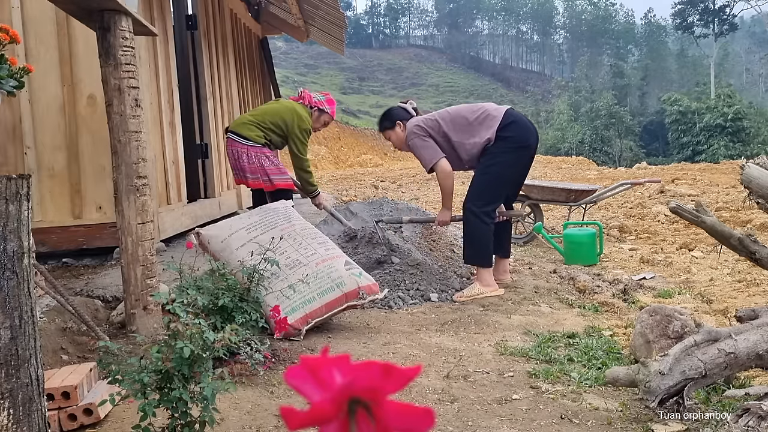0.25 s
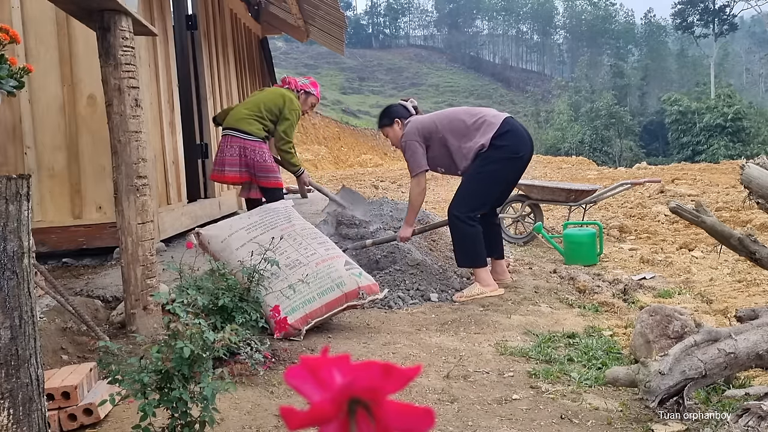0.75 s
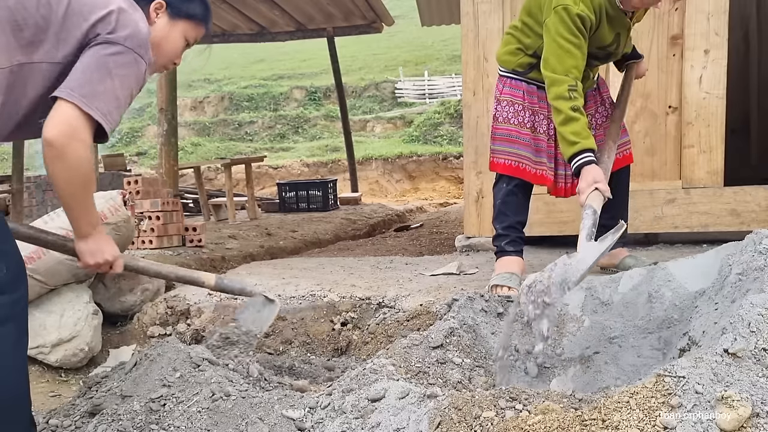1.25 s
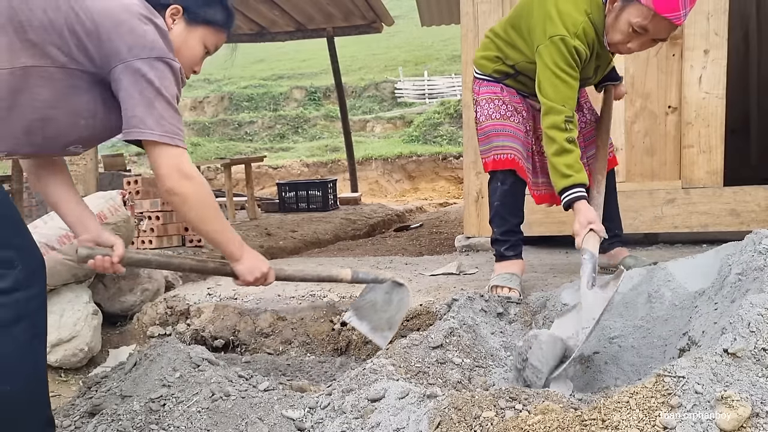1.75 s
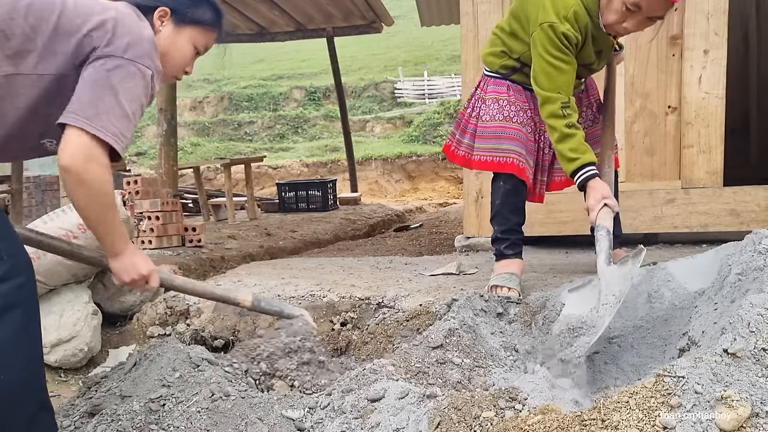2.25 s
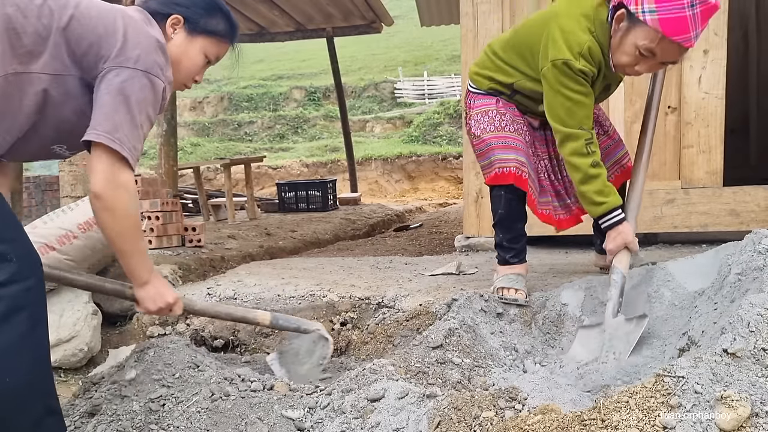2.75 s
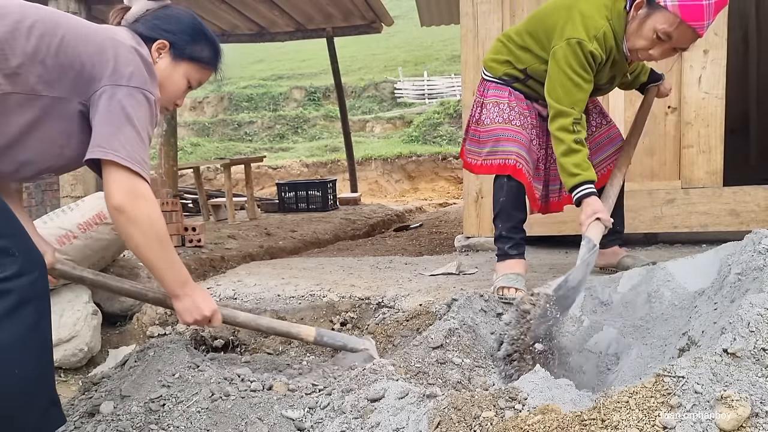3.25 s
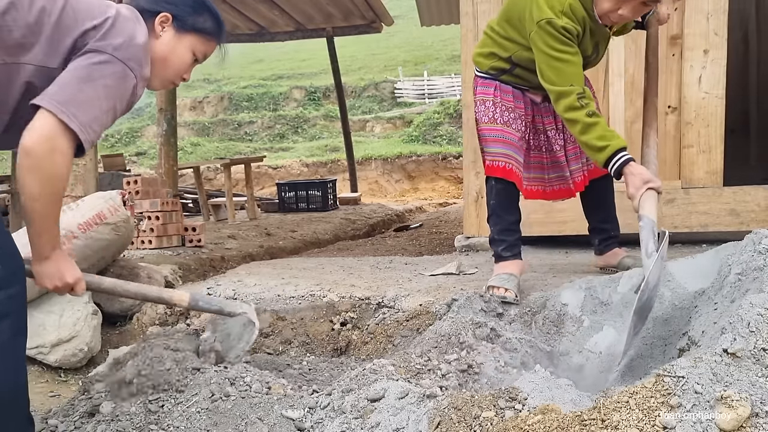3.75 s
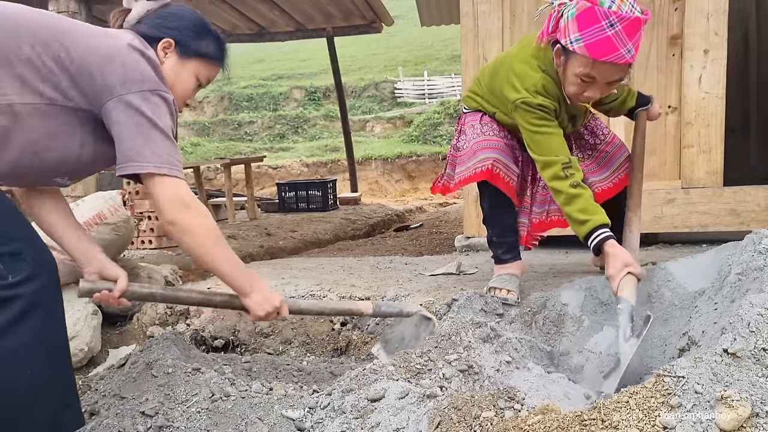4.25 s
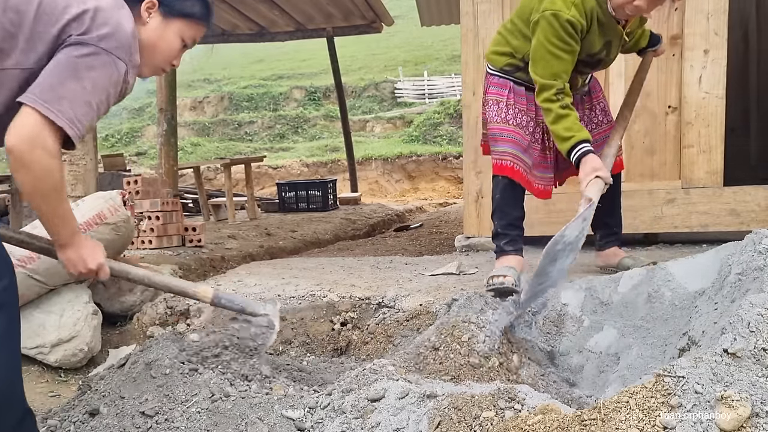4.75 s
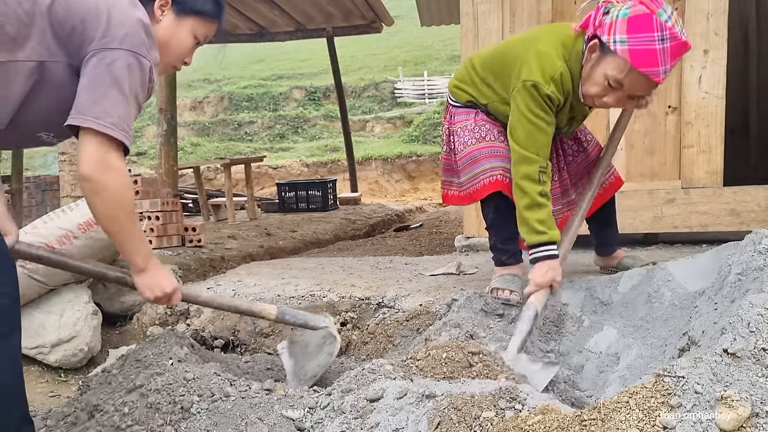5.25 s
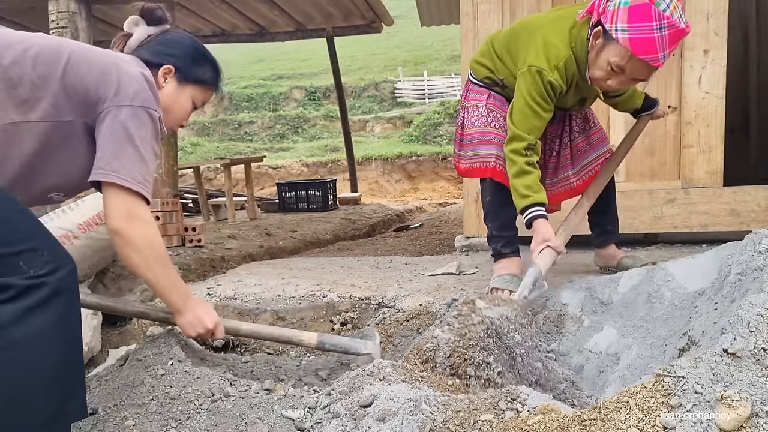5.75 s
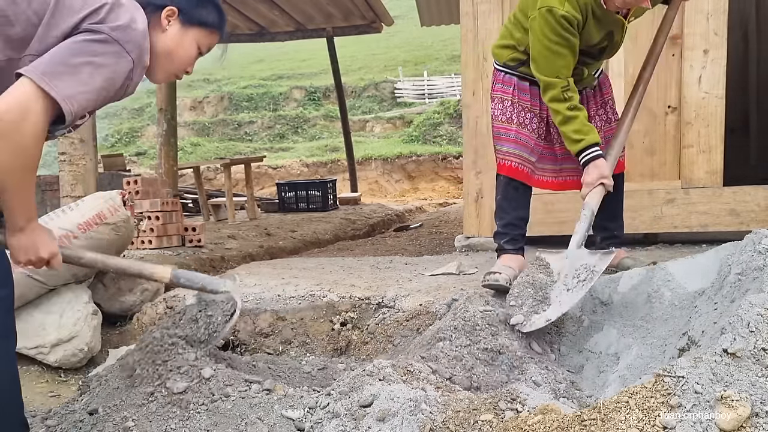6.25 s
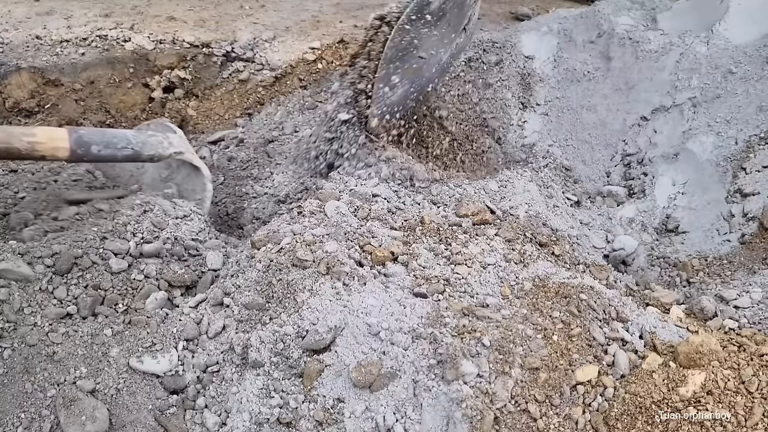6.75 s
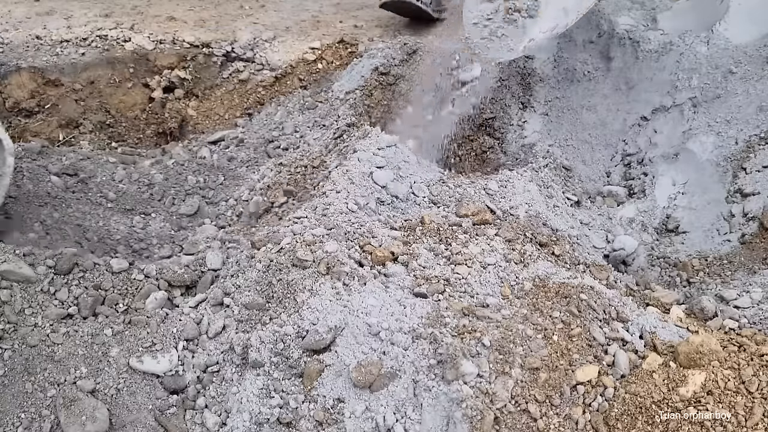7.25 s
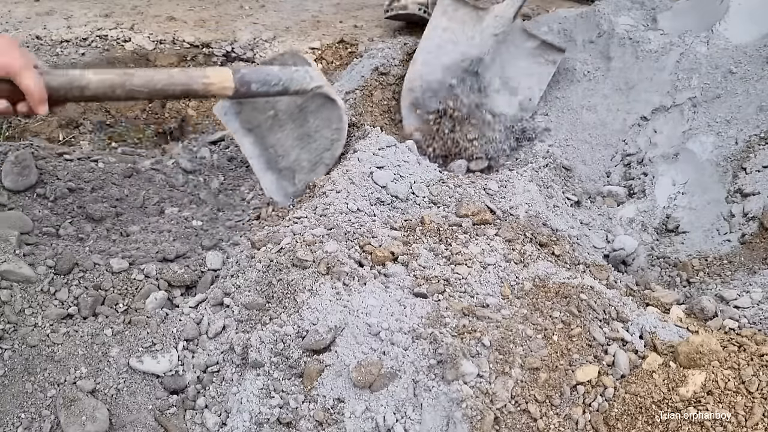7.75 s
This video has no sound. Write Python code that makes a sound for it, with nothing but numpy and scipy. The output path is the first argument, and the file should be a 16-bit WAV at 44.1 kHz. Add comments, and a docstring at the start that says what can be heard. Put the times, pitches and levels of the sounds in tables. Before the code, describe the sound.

Gritty shovel thrusts and short hoe drags turn a dry gravelly heap, with sharp stone knocks, slight clinks and a faint distant engine.

```python
"""Loose mix trickles first, over faint outdoor air; a hoe and a steel shovel then turn a dry heap.
The heap is cement and gravel beside a wooden house. Each stroke is a swarm of random grain contacts
that excites the blade's modes, split into thud, crunch and hiss. Stones crack and clack on the steel,
spills and pebbles settle, and free blades clink. A bird peeps twice as falling, fluttering tones;
a far engine drones for a while as a firing tone with its octave."""
import sys
import numpy as np
from scipy import signal
from scipy.fft import rfft, irfft
from scipy.io import wavfile

SR = 44100
rng = np.random.default_rng(int(sys.argv[2]) if len(sys.argv) > 2 else 0)


def digitize_waveform(pressure):
    """Quantize a signal to 16-bit integers and store it at the path in sys.argv[1].

    Rows of a 2-D input are taken as channels; values are limited to [-1, 1].
    """
    field = np.atleast_2d(pressure).T
    bounded = np.clip(field, -1, 1)
    quanta = np.round(bounded * 32767).astype(np.int16)
    wavfile.write(sys.argv[1], SR, quanta)


N = 352778  # length [samples]

# Outdoor air, spectral shape: (frequency [Hz], relative density [dB per Hz])
AIR_SPECTRUM = [(25, 0), (60, 16.5), (140, 10.5), (250, 5.5), (400, -9.5), (800, -3.5), (1600, -0.5),
                (3200, -1.5), (6000, -6.5), (15000, -17.5)]
# Far engine: (time [s], mean firing rate [Hz], level before gain and waver [dB])
ENGINE_COURSE = [(1.0, 42.5, -61), (1.24, 42.9, -65), (1.68, 44.6, -56), (1.82, 45.9, -66),
                 (2.27, 46.6, -57.5), (2.43, 51.75, -64), (3.29, 53, -59.5), (3.45, 44.8, -68),
                 (3.6, 43.4, -60)]
# Bird: (time [s], length [s], first pitch [Hz], last pitch [Hz], level [dB]); pitches before flutter
BIRD_PEEPS = [(1.234, 0.072, 4910, 2830, -56), (6.075, 0.1, 4610, 2700, -60.5)]
# Pebbles landing: (time [s], level of the whole tick [dB], thud re crunch [dB], hiss re crunch [dB])
PEBBLE_LANDINGS = [(0.516, -38, 0, 13), (.721, -39, 2, -16), (0.7688, -40.5, 2.5, 1.5),
                   (1.553, -33, 10, 22), (3.033, -41, 1, 3), (3.643, -54, 1, 9), (3.523, -46.5, -3, -15),
                   (5.8718, -32.5, 13, 1), (7.125, -41.5, -21.5, 14.5), (7.4474, -26.5, -10, 12)]
# Loose mix slides off a blade or down the heap:
# (time [s], build-up [s], peak level before gain [dB], fade [dB/s], thud re crunch [dB], hiss re crunch [dB])
SLIDES = [(0, 0.0017, -49, 91, 1, -0.5), (.525, 0.01, -51, 55, 0, 0), (.752, 0.0066, -52.5, 244, -8, -6.5),
          (.938, .006, -59, 33, -12, -2.5), (1.221, 0.0035, -47.5, 255, -10, -7),
          (1.272, 0.011, -55, 214, -9, -4), (2.19, 0.028, -59.5, 62, -2, -7),
          (2.451, 0.012, -57, 196, -9, -9.5), (2.93, 0.07, -57, 75, 2, -1.5),
          (3.21, 0.043, -47.5, 143, -4, -1.5), (3.471, 0.019, -57.5, 43, -16, 0.5),
          (3.705, 0.047, -47.5, 113, -3, -2), (4.59, 0.025, -45.5, 133, -11, -6),
          (4.69, 0.034, -61, 97, 1, -11), (4.912, 0.028, -55, 174, -12, -8),
          (5.522, 0.022, -57.5, 60, -17, -3), (5.805, 0.021, -42.5, 116, -5.5, -3.5),
          (5.95, 0.021, -59.5, 21, -7.5, 2), (6.273, 0.019, -54, 52, -15, -3.5),
          (6.753, .006, -53.5, 53, -2, -6), (6.855, 0.04, -52, 13, -6, -4), (7.07, 0.011, -63, -3, -5, 4.5),
          (7.5, 0.023, -48.5, 106, -5.5, -0.5), (7.56, 0.024, -49.5, 69, -7, -1)]
# A free blade clinks: (time [s], level of the whole clink [dB], skid time constant [s], grit re ring [dB])
FREE_CLINKS = [(3.448, -29, 0.0044, 3), (7.030, -21.5, 0.0025, -14), (7.037, -27.5, 0.0068, 13)]
# Blades on stones: (time [s], level of the whole blow before gain [dB], thud re crunch [dB],
# hiss re crunch [dB], clack pitch [Hz], crushing time constant [s], clack re crunch [dB])
SHOVEL_HITS = [(1.2261, -29, 10, -3.5, 4200, 0.0058, 6.5), (1.2766, -33.5, 8, -15, 2930, 0.014, 0),
               (1.317, -35.5, -1, -7, 1560, 0.005, -25), (2.5677, -34.5, -6, -1, 1460, 0.0097, 5),
               (2.6865, -19, -7, 11, 1100, 0.0056, 19), (2.6995, -19.5, 6, 12, 1510, 0.008, 22),
               (2.9514, -32.5, 7, 0, 760, 0.0054, -13), (3.8701, -23.5, -13, 15, 2570, 0.0028, -7),
               (4.0555, -24, -7, 0, 1195, 0.023, 2), (4.1042, -25, -5, 4, 1180, 0.01, 8),
               (5.0479, -23, -34, 3, 4270, 0.0043, -7), (5.1635, -21, -9, 12, 3240, 0.013, -2),
               (5.2357, -17.5, -12, -28, 1084, 0.015, -3), (5.9896, -29.5, -22, -12, 2430, 0.0084, -12),
               (6.0144, -26, -17, -5, 3580, 0.0023, -19), (6.3283, -27.5, -4, 1, 4800, 0.01, 4),
               (6.365, -18, -24, 0, 2240, 0.0027, 0), (6.383, -24, -14, -2, 2000, 0.0027, 6),
               (6.5172, -16.5, 21, 18, 1460, 0.0042, 22), (6.5849, -21.5, 11, 16, 1410, 0.0042, -7),
               (7.8195, -7.5, -31, -12, 1450, 0.012, 3), (7.8319, -11.5, -28, -18, 1490, .012, 4),
               (7.8947, -15.5, -1, -13, 1090, 0.0049, -3)]
HOE_HITS = [(.3922, -36.5, -25, -12, 3370, .008, 0), (1.0215, -33.5, -5, -15, 3260, 0.009, 3),
            (1.4412, -33, -22, 19, 3060, 0.0038, 10), (1.4941, -27.5, 4, -15, 710, .0065, 10),
            (1.5925, -30, -20, 1, 607, 0.014, 9), (1.6407, -28, -15, 15, 3540, 0.0058, -12),
            (1.9615, -34, -22, 6, 2920, 0.0059, -1), (1.977, -29, -15, 8, 3780, 0.004, -8),
            (2.0005, -10.5, -32, 1.5, 3240, 0.0021, -9), (2.0147, -16.5, -14, -7, 1710, 0.0054, 6),
            (2.0212, -11, -21, -2, 1250, 0.0016, 5.5), (3.1441, -27.5, -1, 3, 2250, 0.0059, 6),
            (3.156, -19, -14, -3, 2230, 0.0089, -23), (4.2684, -30, -3, -6, 1620, 0.0052, 10),
            (4.3675, -17.5, -16, 7, 2010, 0.0017, 12.5), (5.5845, -27, -32, 3, 2760, 0.0086, -1),
            (5.6402, -28.5, -25, -7, 1660, 0.013, 10), (5.673, -17, 2, -3, 3340, 0.0053, -5),
            (5.6912, -12.5, 4, 6, 185, 0.0047, 4), (5.6974, -8, 0, -0.5, 700, 0.0038, -4.5),
            (7.2691, -18.5, -2, -2, 704, 0.0021, 16), (7.3477, -22.5, -18, -0.5, 750, 0.0046, 4.5),
            (7.6519, -22, -6, -3, 4400, 0.003, -16), (7.6885, -12, -5, -1.5, 3620, 0.0091, -19),
            (7.6935, -15, -9, -22, 3200, 0.011, -3), (7.773, -11, -8, -1, 2920, 0.0057, 4)]
# Strokes, the shovel pushed in and the hoe dragged: (time [s], stroke length [s],
# mid-stroke crunch level before gain and arch [dB], swell over the stroke [dB], fade [dB/s],
# thud re crunch [dB], hiss re crunch [dB])
SHOVEL_STROKES = [(2.582, 0.28, -41.5, 1, 158, -3.5, -0.5), (3.868, 0.27, -42.5, -1.5, 186, -3.5, -2.5),
                  (5.047, 0.26, -35, 2, 209, -10, -2.5), (6.32, 0.31, -38.5, 6.5, 270, -5.5, -1),
                  (7.686, 0.21, -30, 4, 183, -10.5, -7.5)]
HOE_STROKES = [(.39, 0.037, -47.5, 8.5, 224, -3, 1.5), (1.018, 0.068, -44.5, 5, 248, -4.5, -3.5),
               (1.44, 0.083, -42.5, -1, 229, -6.5, -1), (1.594, 0.068, -47.5, 7.5, 188, -5, -5),
               (1.96, 0.079, -41.5, 6.5, 302, -3, -1), (2.06, 0.052, -42.5, 2, 260, -5, -9.5),
               (3.132, 0.031, -38, 0, 168, -0.5, -1), (4.28, 0.22, -44, 2.5, 136, -3.5, -3.5),
               (5.586, 0.18, -44, -4.5, 129, -3, -0.5), (5.668, 0.038, -39.5, -3.5, 600, 10, 6),
               (7.236, 0.037, -38.5, 8, 300, -3.5, -0.5), (7.322, 0.14, -49, -9.5, 300, 2, -1),
               (7.648, 0.038, -35.5, -8, 200, -17, -5)]
# Mean blade modes before each contact's shift: (frequency [Hz], level [dB], unburied t60 [s])
SHOVEL_RESONANCES = [(1190, -44, 0.064), (1162, 6.5, 0.25), (1340, -43, 0.029), (1430, -2, 0.12),
                     (1570, 14.5, 0.065), (1880, 5, 0.053), (2170, -23, .06), (2250, 13.5, 0.15),
                     (2716, 12, 0.083), (2830, -6, 0.45), (3240, 9, 0.078), (4580, -14, 0.2)]
HOE_RESONANCES = [(613, -19, .1), (740, 0, 0.14), (1149, 4.5, 0.14), (1454, 5, 0.08), (1745, -1.5, 0.29),
                  (2400, 0, 0.072), (2250, 1, 0.043), (3000, 17.5, 0.032), (3460, 15, 0.054),
                  (4200, -35, .09), (5450, 0, 0.13)]
CLINK_RESONANCES = [(604, 9, 0.11), (1390, 18.5, 0.078), (1380, -4, 0.066), (1920, 15, 0.071),
                    (2010, -8, 0.028), (2090, 11, .04), (2210, -10, 0.043), (2530, 2.5, 0.093),
                    (3330, -18, 0.1), (3460, -2, 0.1), (3900, -18, 0.15), (4660, -8, 0.081)]
# Spectra of grain contacts, cracking stone and snapping grit: (frequency [Hz], relative density [dB per Hz])
SHOVEL_SPECTRUM = [(30, -7), (70, 3), (160, 9), (250, 7), (380, -0.5), (620, 8), (900, -13.5), (1120, 5.5),
                   (1280, 6.5), (1470, 5.5), (1750, 7), (3000, 6), (5000, 1.5), (8000, 5), (15000, -5)]
HOE_SPECTRUM = [(30, -6), (70, -1), (170, 8), (350, 2), (650, 7.5), (1000, -12), (2000, 0), (3300, -9),
                (5000, -10.5), (8000, -9.5), (15000, -25)]
SPILL_SPECTRUM = [(30, -14), (80, 5), (160, 9.5), (350, 5.5), (650, 10), (1000, -6), (1800, 1), (3300, -6),
                  (5000, -11), (8000, -12.5), (15000, -23)]
CRACK_SPECTRUM = [(30, -51), (80, -18), (180, -5), (380, -1.5), (800, 2.5), (1400, 11.5), (2400, 15),
                  (3500, 4), (5000, 0.5), (8000, -4.5), (15000, -17.5)]
SNAP_SPECTRUM = [(100, -19), (700, -5), (2500, 1.5), (8000, -5), (15000, -20)]
# Microphone responses: (frequency [Hz], gain [dB])
LEFT_RESPONSE = [(60, 3), (500, -3.5), (1100, -1.5), (3500, 0), (6800, -1), (7900, 4), (8900, -5),
                 (15000, 3)]
RIGHT_RESPONSE = [(60, -1.5), (500, -4), (1100, -2), (3500, 1.43), (6800, 3.5), (7900, 6.5), (8900, -0.5),
                  (15000, 5)]

LOW_HZ, HIGH_HZ = 900, 5000  # borders between thud, crunch and hiss
TOP_HZ = 15700  # upper limit of the microphones
AIR_SWAY_DB = 1.5
ENGINE_FROM_S, ENGINE_UNTIL_S, ENGINE_FADE_S = 0.87, 3.67, 0.25
YARD_T60_S = 0.2
SNAP_DB, SNAP_SPREAD_DB = -13.5, 2  # snaps against the rub, spread of their sizes
SURGE_DB = 3.5  # clustering of stones
TAIL_DB = 40  # a stroke is followed down by this much
SLIDE_REST_S = 0.3  # a slide has nearly come to rest after about this long


def undb(db):
    """Amplitude is ten to the power of decibels over twenty."""
    return 10 ** (np.asarray(db) / 20)


def unit(x):
    """Normalisation to a root mean square of 1."""
    return x / np.sqrt(np.mean(x ** 2) + 1e-20)


def add(out, s, x):
    """Superposition: a sound joins the mix at time s [s]."""
    i = int(np.clip(s * SR, 0, N - 1))
    out[:, i:i + x.shape[1]] += x[:, :N - i]


def through(x, response):
    """Linear filtering: convolution with an impulse response."""
    return signal.fftconvolve(x, np.atleast_2d(response), axes=1)[:, :x.shape[1]]


def colour(points, size=2048):
    """Minimum phase: folding the cepstrum makes a (Hz, dB) spectrum a causal impulse response."""
    hz, db = np.transpose(points)
    freqs = np.maximum(np.arange(size // 2 + 1) * SR / size, 1)
    gain = undb(np.interp(np.log(freqs), np.log(hz), db))
    cepstrum = irfft(np.log(gain))
    cepstrum[1:size // 2] *= 2
    cepstrum[size // 2 + 1:] = 0
    return irfft(np.exp(rfft(cepstrum)))


def walk(n, rate):
    """Random modulation: straight lines join normal random values drawn at the given rate [1/s]."""
    return np.interp(np.arange(n) / SR * rate, np.arange(4096), rng.standard_normal(4096))


def air(level_db=-60.0):
    """Partial coherence: the rumble is alike on both sides, the hiss differs between them."""
    common, difference = rng.standard_normal((2, N))
    difference = signal.sosfilt(signal.butter(1, 900, "high", fs=SR, output="sos"), difference)
    noise = common + np.array([[1], [-1]]) * difference
    sway_db = AIR_SWAY_DB * walk(N, 2.53)
    return unit(through(noise, colour(AIR_SPECTRUM))) * undb(level_db + sway_db)


def engine(gain_db=1.0, second_db=-14, waver_db=5.0):
    """Periodic firing: only the fundamental and its octave carry from a far engine."""
    t = np.arange(N) / SR
    s, hz, db = np.transpose(ENGINE_COURSE)
    firing_hz = np.interp(t, s, hz) * (1 + 0.013 * walk(N, 10.7))
    phase = 2 * np.pi * np.cumsum(firing_hz) / SR
    tone = unit(np.sin(phase) + undb(second_db) * np.sin(2 * phase))
    fade = np.clip(np.minimum(t - ENGINE_FROM_S, ENGINE_UNTIL_S - t) / ENGINE_FADE_S, 0, 1)
    level_db = np.interp(t, s, db) + gain_db + waver_db * walk(N, 10)
    return tone * fade * undb(level_db)


def yard(x, wet_db=-16, dull_hz=4500):
    """Diffuse reflection: the house wall and eaves return a short, dull, decaying scatter."""
    t = np.arange(SR // 2) / SR
    decay = np.exp(-np.log(1000) * t / YARD_T60_S) * np.clip(t / 0.0009, 0, 1)
    tail = rng.standard_normal((2, len(t))) * decay
    tail = signal.sosfilt(signal.butter(2, [500, dull_hz], "band", fs=SR, output="sos"), tail)
    return x + undb(wet_db) * through(x, unit(tail) / np.sqrt(len(t)))


def bird():
    """Frequency modulation: husky whistles glide down and flutter in pitch and level."""
    out = np.zeros((2, N))
    for s, length, first_hz, last_hz, db in BIRD_PEEPS:
        u = np.linspace(0, 1, int(length * SR))
        pitch_hz = last_hz + (first_hz - last_hz) * (1 - u) ** 1.7 + 200 * walk(len(u), 417)
        phase = 2 * np.pi * np.cumsum(pitch_hz) / SR
        envelope = (u * (1 - u)) ** .3 * undb(4 * walk(len(u), 130))
        tone = unit(np.sin(phase) * envelope)
        add(out, s, undb(db) * tone[None])
    return out


def blade(modes, detune=0.0074):
    """Modal synthesis: decaying steel modes, energy 1; load and contact point shift them each time."""
    hz, db, t60 = np.transpose(modes)[:, :, None]
    shift, size = rng.standard_normal((2, len(modes), 1))
    t = np.arange(SR // 5) / SR
    decay = undb(db + 2 * size - 60 * t / t60)
    ring = np.sum(decay * np.sin(2 * np.pi * hz * (1 + detune * shift) * t), axis=0)
    return unit(ring) / np.sqrt(len(t))


def clack(hz, cycles):
    """Strong damping: one stone's pitch dies away within a few cycles."""
    t = np.arange(SR // 25) / SR
    return unit(np.sin(2 * np.pi * hz * t) * np.exp(-t * hz / cycles))


def grains(n, spread_db, lag, scatter=3.5, count=7000):
    """Shot noise: random contacts in up to a second; the left channel has its own lag [samples]."""
    at = rng.integers(0, SR, count)
    size_db = spread_db * np.minimum(rng.exponential(size=count), 5)
    size = undb(size_db) * rng.choice([-1, 1], count)
    late = np.round(lag + scatter * rng.laplace(size=count)).astype(int)
    return np.array([np.bincount(i % SR, size, SR)[:n] for i in (at + late, at)])


def stones(n, lag, centre_hz=1500, octaves=1.71, tick_db=5, spread_db=5, count=320):
    """Random impacts: up to a second of coarse stones, each with a tick and a pitch of its own."""
    out = np.zeros((2, N))
    for at, pitch, size in rng.random((count, 3)):
        sound = clack(centre_hz * 2 ** (octaves * (2 * pitch - 1)), cycles=3)
        sound[0] += undb(tick_db) * sound.max()
        sound = np.pad(sound, 32) * undb(-spread_db * np.log(max(size, .06)))
        add(out, at, np.array([np.roll(sound, round(lag)), sound]))
    return out[:, :n]


def parts(x):
    """Band splitting: a contact sound divides into thud, crunch and hiss."""
    cuts = [(LOW_HZ, "low"), ([LOW_HZ, HIGH_HZ], "band"), (HIGH_HZ, "high")]
    return [signal.sosfilt(signal.butter(4, hz, kind, fs=SR, output="sos"), x) for hz, kind in cuts]


def burst(crush_s, lag, press=0.43):
    """Brittle fracture: a run of contacts builds under pressure and fades quickly."""
    t = np.arange(SR // 5) / SR
    build = np.minimum(t / (press * crush_s + 1e-5), 1)
    return grains(len(t), 2.7, lag, scatter=2.7, count=16000) * np.exp(-t / crush_s) * build


def knock(push, contact, thud_db, hiss_db):
    """Impact spectrum: the dry contact, with its shares of thud and hiss."""
    thud, crunch, hiss = map(unit, parts(through(push, contact)))
    return crunch + undb(thud_db) * thud + undb(hiss_db) * hiss


def sized(x, db, crush_s):
    """Impact energy: that of level db held for the crushing time, at least 2 ms."""
    return unit(x) * undb(db) * np.sqrt(max(crush_s, .002) * SR / x.shape[1])


def pebbles(crush_s=0.00063):
    """Short impact: loose pebbles land with a tick and no blade ring."""
    out, contact = np.zeros((2, N)), colour(CRACK_SPECTRUM)
    for s, db, thud_db, hiss_db in PEBBLE_LANDINGS:
        tick = knock(burst(crush_s, lag=0), contact, thud_db, hiss_db)
        add(out, s, sized(tick, db, crush_s))
    return out


def lifetime(rise_s, fade_db_per_s):
    """Decay time: the time axis of a stroke's rise and fade, kept between 0.05 and 1 s."""
    length_s = np.clip(rise_s + TAIL_DB / max(fade_db_per_s, 1), .05, 1)
    return np.arange(int(length_s * SR)) / SR


def grind(n, grit, modes, ring_db, spread_db, judder_db, lag, stones_db):
    """Stick-slip friction: gravel on steel comes in uneven surges; gives thud, crunch and hiss."""
    swarm = grains(n, spread_db, lag) * undb(judder_db * walk(n, 130.1))
    rub = unit(through(swarm, colour(grit)))
    buried = np.multiply(modes, [1, 1, .5])  # it rings half as long
    rub += undb(ring_db) * unit(through(swarm, blade(buried)))
    snaps = grains(n, SNAP_SPREAD_DB, lag, count=330)  # coarse grit under the edge
    rub += undb(SNAP_DB) * unit(through(snaps, colour(SNAP_SPECTRUM)))
    clusters = stones(n, lag) * undb(SURGE_DB * walk(n, 35.7))
    rub += undb(stones_db) * unit(clusters)
    return map(unit, parts(rub))


def spills(gain_db):
    """Granular flow: a slide of loose mix gathers, then trickles out."""
    out = np.zeros((2, N))
    for s, build_s, db, fade, thud_db, hiss_db in SLIDES:
        t = lifetime(build_s, fade)
        flow = np.minimum(t / build_s, 1) * undb(db + gain_db - fade * np.maximum(t - build_s, 0))
        flow *= np.exp(-(t / SLIDE_REST_S) ** 4)
        thud, crunch, hiss = grind(len(t), SPILL_SPECTRUM, SHOVEL_RESONANCES, ring_db=-8, spread_db=.8,
                                   judder_db=2.5, lag=1, stones_db=-9)
        add(out, s, flow * (undb(thud_db) * thud + crunch + undb(hiss_db) * hiss))
    return out


def clinks(thud_db=-22, hiss_db=-8):
    """Free vibration: lifted clear of the heap, a blade rings more freely and hardly thuds."""
    out, contact = np.zeros((2, N)), colour(CRACK_SPECTRUM)
    for s, db, skid_s, grit_db in FREE_CLINKS:
        push = burst(skid_s, lag=5.7)
        radiated = np.diff(blade(CLINK_RESONANCES, detune=0.0066))  # an open plate radiates little bass
        sound = unit(through(push, radiated))
        sound += undb(grit_db) * knock(push, contact, thud_db, hiss_db)
        add(out, s, sized(sound, db, skid_s))
    return out


def knocks(table, modes, ring_db, lag, gain_db):
    """Impact excitation: one crack drives both the stone's clack and the steel's ring."""
    out, contact = np.zeros((2, N)), colour(CRACK_SPECTRUM)
    for s, db, thud_db, hiss_db, hz, crush_s, clack_db in table:
        push = burst(crush_s, lag)
        sound = knock(push, contact, thud_db, hiss_db)
        sound += undb(clack_db) * unit(through(push, clack(hz, cycles=4)))
        sound += undb(ring_db) * unit(through(push, blade(modes)))
        add(out, s, sized(sound, db + gain_db, crush_s))
    return out


def digs(table, grit, modes, bite_s, load_s, lift_s, arch_db, linger,
         ring_db, spread_db, judder_db, lag, stones_db, gain_db):
    """Driven friction: the edge bites, effort arches, the mix settles; thud grows with load and lingers."""
    out = np.zeros((2, N))
    for s, length, db, swell_db, fade, thud_db, hiss_db in table:
        t = lifetime(length, fade)
        progress = np.minimum(t / length, 1)
        after_s = np.maximum(t - length, 0)
        effort_db = db + gain_db + swell_db * (progress - .5) + arch_db * np.sin(np.pi * progress)
        settle_db = -fade * after_s
        # linger is the share of the settling, in dB, that the thud is spared
        load = (1 - np.exp(-(t / load_s) ** 2)) * undb(thud_db - linger * settle_db)
        thud, crunch, hiss = grind(len(t), grit, modes, ring_db, spread_db, judder_db, lag, stones_db)
        contact = np.minimum(t / bite_s, 1) * np.exp(-(after_s / lift_s) ** 4)  # until the blade lifts clear
        stroke = load * thud + crunch + undb(hiss_db) * hiss
        add(out, s, stroke * undb(effort_db + settle_db) * contact)
    return out


def scene():
    """Superposition: work and bird reflect in the yard; air and engine are added without reflection."""
    work = digs(SHOVEL_STROKES, SHOVEL_SPECTRUM, SHOVEL_RESONANCES, bite_s=0.003, load_s=0.012, lift_s=0.14,
                arch_db=2.5, linger=0.43, ring_db=-13, spread_db=-0.5, judder_db=1.35, lag=5,
                stones_db=-7.0, gain_db=1.5)
    work += digs(HOE_STROKES, HOE_SPECTRUM, HOE_RESONANCES, bite_s=0.0094, load_s=0.023, lift_s=0.091,
                 arch_db=2.5, linger=0.45, ring_db=-10, spread_db=1.43, judder_db=1.5, lag=0,
                 stones_db=-9.5, gain_db=-0.95)
    work += spills(gain_db=0.27)
    work += knocks(SHOVEL_HITS, SHOVEL_RESONANCES, ring_db=-26.0, lag=6.7, gain_db=-5.5)
    work += knocks(HOE_HITS, HOE_RESONANCES, ring_db=-6.5, lag=0.97, gain_db=-4.5)
    return yard(work + clinks() + pebbles() + bird()) + air() + engine()


def record(dry):
    """Transducer response: presence peaks, a brighter right side, deep bass and top cut."""
    heard = through(dry, [colour(LEFT_RESPONSE), colour(RIGHT_RESPONSE)])
    heard = signal.sosfilt(signal.butter(4, 36, "high", fs=SR, output="sos"), heard)
    return signal.sosfilt(signal.ellip(10, .2, 80, TOP_HZ, fs=SR, output="sos"), heard)


dry = scene()
out = record(dry)
digitize_waveform(out)
```